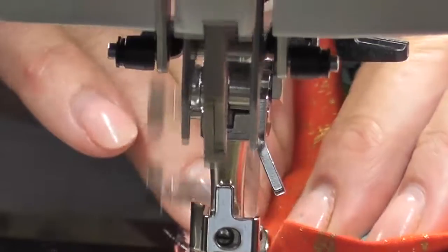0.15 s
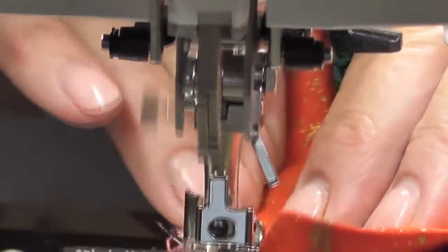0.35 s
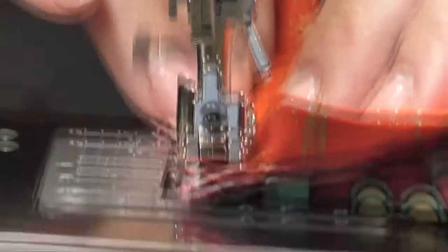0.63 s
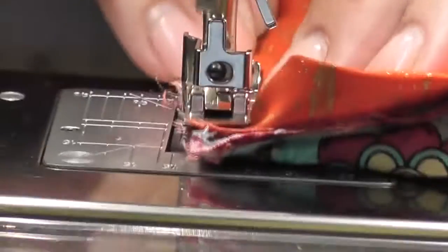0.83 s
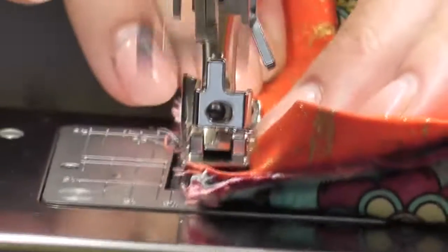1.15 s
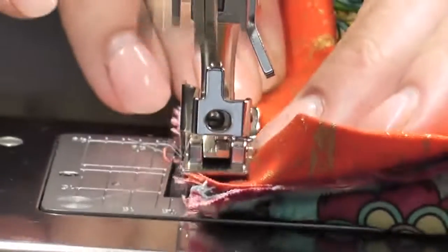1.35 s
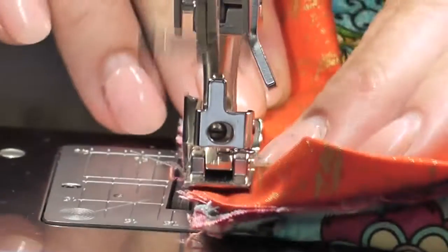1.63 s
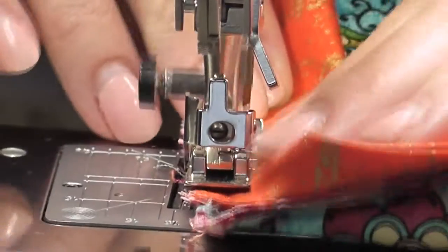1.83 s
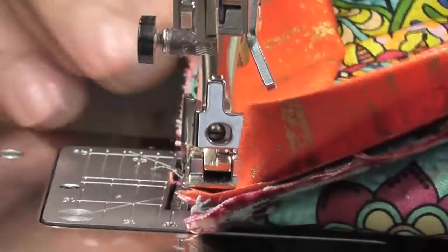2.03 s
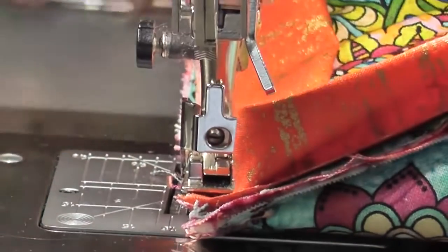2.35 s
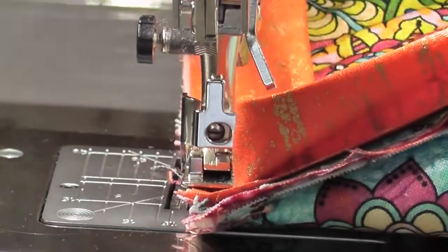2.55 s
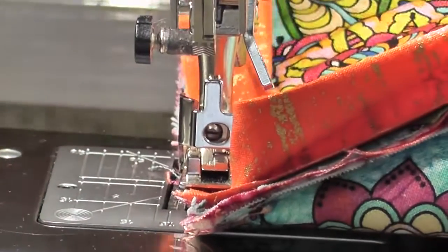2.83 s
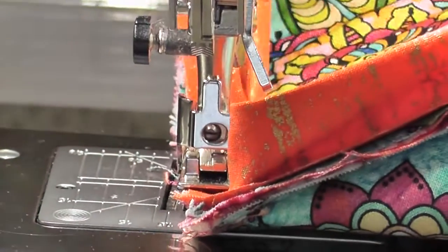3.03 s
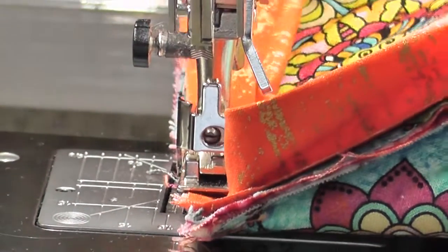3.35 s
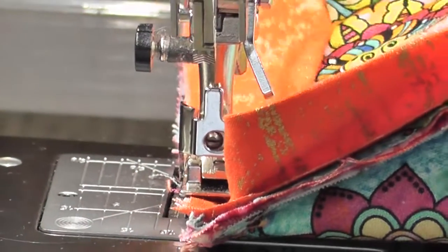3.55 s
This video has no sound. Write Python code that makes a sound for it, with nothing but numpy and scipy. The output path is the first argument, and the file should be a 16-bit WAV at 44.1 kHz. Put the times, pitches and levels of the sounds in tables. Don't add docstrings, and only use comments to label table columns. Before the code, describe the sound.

Close stereo pickup of a domestic sewing machine running steadily with knocking gears and ringing loose covers, coasting quickly to rest, then soft fabric rustle and light taps on the bed over low room hiss and hum.

```python
import sys
import numpy as np
from scipy import signal
from scipy.fft import rfft, irfft, next_fast_len
from scipy.io import wavfile
from scipy.ndimage import map_coordinates

SR = 44100
rng = np.random.default_rng(int(sys.argv[2]) if len(sys.argv) > 2 else 0)


def gain_from_decibels(decibels):
    exponent = np.asarray(decibels, float) / 20
    return 10 ** exponent


def wav_record(signal):
    frames = np.transpose(np.atleast_2d(signal))
    bounded = np.clip(frames, -1, 1)
    quanta = np.round(bounded * 32767).astype(np.int16)
    wavfile.write(sys.argv[1], SR, quanta)


N = 163170
T = np.arange(N) / SR

# freq_hz, density_db [dB per Hz]
HOOK_SPECTRUM = [(300, -21), (900, -13), (1600, 0), (4000, -7.5), (9000, -10), (13000, -13), (15700, -27)]


def unit(x):
    return x / np.sqrt(np.mean(x ** 2) + 1e-20)


def along(points, hz):
    f, v = np.transpose(points)
    return np.interp(np.log(hz + 1), np.log(f + 1), v)


def wobble(rate_hz):
    knots = rng.standard_normal(int(N * rate_hz / SR) + 4)
    return map_coordinates(knots, [T * rate_hz])


def filtered(x, response):
    n = x.shape[-1]
    m = next_fast_len(n + 8192)
    return irfft(rfft(x, m) * response(np.fft.rfftfreq(m, 1 / SR)), m)[..., :n]


def resonance(f, centre_hz, width_hz):
    damping = 1j * f * width_hz
    return damping / (centre_hz ** 2 - f * f + damping)


def body(modes, broad=0, tilt_db=0, dull_hz=20000):
    def response(f):
        ring = sum((-1) ** k * gain_from_decibels(db) * resonance(f, c, w) for k, (c, w, db) in enumerate(modes))
        tilt = gain_from_decibels(tilt_db * np.log2((f + 1) / 1000))
        low_cut = (1 + 120 / (1j * f + 1)) ** 2
        return tilt * (broad + ring) / (1 + 1j * f / dull_hz) ** 2 / low_cut
    return response


def colour(points):
    return lambda f: gain_from_decibels(along(points, f)) * (f > points[0][0])


def ringing(points):
    # centre_hz, width_hz, lift_db (negative
    modes_and_parts = [(138.4, 9.1, 9.5), (331, 17, -18), (355, 14, 1.5), (474, 11, 7), (603, 20, 5.5), (990, 99, 5),
                       (1270, 41, 7.5), (1575, 20, 10), (2134, 72, 6), (3147, 50, 4.5), (3610, 370, 6),
                       (4160, 220, 3.5), (6325, 56, 8.5), (7800, 40, -14)]

    def response(f):
        lift = 1 + sum((gain_from_decibels(db) - 1) * resonance(f, c, w) for c, w, db in modes_and_parts)
        return colour(points)(f) * lift
    return response


def add(track, start_s, level_db, rise_s, t60_s, response, spiky_db):
    t = np.arange(int(SR * min(rise_s + t60_s, .33)) + 300) / SR
    noise = rng.standard_normal(len(t)) * gain_from_decibels(spiky_db * rng.standard_normal(len(t)))
    after = np.clip(t - rise_s, 0, None)
    rise = np.clip(t / max(rise_s, 1e-4), 0, 1) ** 2
    blow = 1 + 0.28 * gain_from_decibels(-60 * after / 0.0063) * (t >= rise_s)
    ring = filtered(noise * rise * gain_from_decibels(-60 * after / t60_s) * blow, response)
    peak = np.sqrt(np.convolve(ring ** 2, np.ones(256) / 256).max())
    track[round(start_s * SR):][:len(t)] += gain_from_decibels(level_db) * ring / peak


def ports(shared, opposed, apart):
    # freq_hz, lean_db
    lean = [(60, -8), (180, -3), (550, 1), (1650, 3), (4970, -1), (15000, 3)]
    # freq_hz, lead_rad
    lead = [(0, 0), (260, 0.15), (11700, 0.045), (14400, -0.8), (15200, 0.1)]

    def sides(f):
        return np.exp(np.outer([.5, -.5], np.log(10) / 20 * along(lean, f) + 1j * along(lead, f)))

    def split(f):
        return np.outer([1, -1], gain_from_decibels(along(apart, f)))
    return filtered(shared, sides) + filtered(opposed, split)


def air():
    # freq_hz, density_db [dB per Hz]
    hiss_spectrum = [(20, -22), (55, -7), (85, -9), (150, 1.5), (300, 2), (1300, -5.5), (4000, -13),
                     (14300, -22.5), (15600, -35)]
    # time_s, level_db
    hiss_level = [(0, -50.5), (2.1, -54.5), (2.31, -56.5), (2.335, -60.5), (2.43, -56.5), (2.5, -56),
                  (2.68, -55), (2.76, -56.5), (2.93, -59), (3, -52), (3.7, -61)]
    # freq_hz, ratio_db
    hiss_apart = [(60, 5), (300, 0), (1500, -4), (5000, -12), (11000, -11), (14000, -3)]
    # freq_hz, rms_db
    hum_lines = [(100, -57.5)]
    a, b = unit(filtered(rng.standard_normal((2, N)), colour(hiss_spectrum))) * gain_from_decibels(.3 * wobble(8))
    hiss = gain_from_decibels(np.interp(T, *np.transpose(hiss_level))) * ports(a, b, hiss_apart)
    hum = sum(np.sqrt(2) * gain_from_decibels(db + 0.32 * wobble(5.5)) * np.sin(2 * np.pi * hz * T) for hz, db in hum_lines)
    return hiss + hum * gain_from_decibels([[-1.8], [1.5]])


def drive():
    # time_s, effort_db
    effort_curve = [(0, 0.5), (.2, -2.5), (.4, -3), (.5, -1.5), (.7, -0.5), (1.2, -1.5), (1.5, -1),
                    (1.75, 0), (1.82, -2.5), (1.845, -6.5), (1.92, -18), (1.97, -16), (2.06, -8),
                    (2.11, -18.5), (2.16, -51)]
    # centre_hz, width_hz, level_db
    case = [(247, 30, -1.5), (511.5, 44, -5.5), (749.5, 14, -4.5), (1107, 96, -8), (1556, 10, -9)]
    # freq_hz, density_db [dB per Hz]
    rattle_spectrum = [(110, -29), (200, -8.5), (350, -6), (620, -6.5), (1200, -10), (2500, -20),
                       (4500, -26.5), (9300, -32.5), (15600, -44.5)]
    # centre_s, peak_db
    surges = [(0.014, -41), (0.078, -34.5), (0.143, -34), (0.222, -30), (0.289, -31), (0.363, -28.5),
              (0.425, -27.5), (0.51, -43), (0.565, -38), (0.654, -42), (0.712, -32), (0.855, -30),
              (0.936, -33), (0.997, -32), (1.084, -39), (1.139, -31.5), (1.222, -35), (1.287, -31.5),
              (1.361, -46), (1.427, -34), (1.486, -43), (1.568, -33), (1.662, -37), (1.712, -32.5),
              (1.829, -40)]
    shaft_hz, load_top_s, teeth_hz = 7.0, .713, 249.8
    coast_s, slowing_per_s = 1.85, 0.62
    idle_db, surge_half_width_s = -42.5, 0.015
    gear_db, rattle_db = -3.5, -32.5

    turn = 2 * np.pi * shaft_hz * (T - load_top_s)
    effort = gain_from_decibels(np.interp(T, *np.transpose(effort_curve))) * (T < effort_curve[-1][0])

    speed = 1 - slowing_per_s * (T - coast_s).clip(0) + .008 * wobble(14) + .018 * np.sin(2 * turn + .6)
    count = np.cumsum(teeth_hz * speed) / SR
    teeth = np.diff(np.floor(count + .06 * wobble(250)), prepend=0).clip(0)
    teeth = teeth * gain_from_decibels(1.2 * rng.standard_normal(N))
    load = gain_from_decibels(idle_db)
    load = load + sum(gain_from_decibels(db) * np.exp(-.5 * ((T - s) / surge_half_width_s) ** 2) for s, db in surges)
    gears = load * unit(filtered(teeth, body(case, broad=0.021, dull_hz=5900)))

    grains = (rng.random(N) < 2600 / SR) * rng.standard_normal(N) * gain_from_decibels(1.55 * rng.standard_normal(N))
    grains = unit(grains) + 0.78 * rng.standard_normal(N)
    shake_db = 0.77 * np.cos(4 * turn + 2.43) + 1.63 * np.cos(2 * turn + 2.5)
    shake_db = shake_db + 0.8 * wobble(40.11) + 0.76 * wobble(5.71)
    loose = unit(filtered(grains * gain_from_decibels(shake_db), ringing(rattle_spectrum)))
    return effort * (gain_from_decibels(gear_db) * gears + gain_from_decibels(rattle_db) * loose)


def hook():
    # blow_s, peak_db
    clacks = [(0.0326, -30.5), (0.1053, -29.5), (0.1754, -30.5), (0.2464, -37), (0.3162, -44),
              (0.3897, -33), (0.463, -28.5), (0.5327, -35), (0.6058, -38), (0.678, -27.5), (0.7508, -29),
              (0.8216, -32.5), (0.893, -29.5), (0.963, -28.5), (1.0342, -31.5), (1.1065, -28),
              (1.1794, -34), (1.2477, -35), (1.318, -35), (1.3913, -29), (1.4622, -31.5), (1.5342, -27.5),
              (1.604, -31.5), (1.6763, -29.5), (1.7473, -34), (1.8497, -33)]
    # blow_s, peak_db
    snaps = [(0.0626, -30.5), (0.281, -38), (0.3494, -43), (0.4194, -39), (0.7077, -30.5), (1.1344, -42),
             (1.3452, -32), (1.4184, -33), (1.5637, -31), (1.7046, -36), (1.7749, -34)]
    out = np.zeros(N + SR)
    for s, db in clacks:
        add(out, s - .012, db - 9.0, .014, .1, ringing(HOOK_SPECTRUM), spiky_db=1.0)
    for s, db in snaps:
        add(out, s - .005, db - 7.5, .006, .07, ringing(HOOK_SPECTRUM), spiky_db=1.5)
    return out[:N]


def knocks():
    # start_s, peak_db, pitch_hz
    slack = [(0.105, -26.5, 1226), (0.108, -23.5, 490), (0.18, -31, 520), (0.234, -23.5, 974),
             (0.253, -27, 525), (0.323, -32, 540), (0.359, -28, 467), (0.387, -23.5, 590),
             (0.437, -29, 440), (0.577, -23, 506), (0.612, -29, 527), (0.646, -32, 473),
             (0.669, -25.5, 497), (0.68, -23.5, 1056), (0.742, -28, 1060), (0.758, -24, 494),
             (0.788, -21.5, 475), (0.815, -24, 500), (0.893, -26, 1576), (0.898, -25.5, 407),
             (0.96, -23, 1093), (0.984, -29, 503), (1.038, -24, 598), (1.092, -27, 1067), (1.181, -34, 500),
             (1.235, -27, 1180), (1.253, -33, 493), (1.359, -26, 518), (1.391, -25.5, 1570),
             (1.435, -29.5, 510), (1.462, -27.5, 1534), (1.518, -28, 1010), (1.608, -32, 497),
             (1.645, -25, 467), (1.661, -24, 1020), (1.702, -32, 470), (1.708, -26, 1006),
             (1.749, -29, 1080), (1.817, -32, 1326)]
    # start_s, peak_db, pitch_hz
    jolt = [
        (1.862, -33, 292),
    ]
    rise_s, t60_s, neighbour_t60_s, offset_db = 0.0022, 0.054, 0.025, 1.5
    out, t = np.zeros(N + SR), T[:SR // 8]
    for s, db, hz in slack + jolt:
        spread, phase = rng.random(2)
        neighbour_hz = hz * (1.12 + 0.34 * spread)
        neighbour = np.sin(2 * np.pi * (neighbour_hz * t + phase)) * gain_from_decibels(-60 * t / neighbour_t60_s)
        ring = np.sin(2 * np.pi * hz * t) + 0.33 * neighbour
        envelope = gain_from_decibels(db + offset_db - 60 * t / t60_s) * (1 - np.exp(-t / rise_s))
        out[round(s * SR):][:len(t)] += envelope * ring
    return out[:N]


def contacts():
    # centre_hz, width_hz, level_db
    braked_case = [(289, 55, 5), (523, 110, -1.5), (960, 120, -2), (1200, 17, -16), (2050, 60, -11)]
    # centre_hz, width_hz, level_db
    bed = [(273, 110, -12), (622, 73, -0.5), (900, 100, -7.5), (1290, 94, -3.5), (1664, 47, -11),
           (2630, 120, -4.5), (3510, 120, -11.5), (3990, 68, -6.5), (5640, 470, -11.5), (7160, 300, -7.5)]
    # start_s, level_db, rise_s, t60_s, tilt_db [dB per octave]
    blows = [
        (1.861, -26, 0.0022, 0.063, -1),
        (1.884, -32, 0.0047, 0.043, -2),
    ]
    # start_s, level_db, rise_s, t60_s, tilt_db [dB per octave]
    taps = [
        (2.5215, -36, .0012, 0.14, -1.7),
        (2.534, -40, 0.005, 0.28, -1.1),
        (2.593, -42.5, .015, 0.089, 1.8),
        (2.611, -40.5, 0.0093, 0.15, -0.7),
        (2.821, -51.5, 0.014, 0.17, -5),
        (2.9565, -48.5, 0.0021, 0.17, 0.8),
        (3.0516, -45.5, .002, 0.14, 1),
    ]
    # start_s, level_db, centre_hz, width_hz, t60_s
    ticks = [(1.9285, -49.5, 6400, 8000, .06), (1.929, -57, 14100, 2400, .075),
             (1.9305, -55, 6400, 750, 0.069), (1.9965, -51, 4870, 330, .04), (1.997, -51, 3460, 280, .045),
             (1.9975, -46, 2240, 280, 0.036), (2.114, -59, 6100, 1600, .05), (2.2925, -45.5, 960, 596, .07),
             (2.3045, -41, 740, 460, 0.12), (2.3635, -53.5, 3220, 1000, .055), (2.391, -49, 268, 200, .23),
             (2.4357, -49.5, 2100, 3100, 0.095), (2.4445, -57, 5100, 600, 0.38),
             (3.0532, -45.5, 3700, 2400, .055), (3.0625, -44.5, 1500, 520, .075)]
    out = np.zeros(N + SR)
    for s, db, rise_s, t60_s, tilt_db in blows:
        add(out, s, db, rise_s, t60_s, body(braked_case, 0.03, tilt_db, dull_hz=2460), spiky_db=3.5)
    for s, db, rise_s, t60_s, tilt_db in taps:
        add(out, s, db, rise_s, t60_s, body(bed, 0.16, tilt_db, dull_hz=3770), spiky_db=2)
    for s, db, hz, width_hz, t60_s in ticks:
        add(out, s, db, .002, t60_s, lambda f: body([(hz, 1.5 * width_hz, 0)])(f) ** 3, spiky_db=3.5)
    return out[:N]


def strokes_envelope(strokes, power):
    arch = lambda s, length_s: np.sin(np.pi * np.clip((T - s) / length_s, 0, 1)).clip(0)
    return sum(gain_from_decibels(db) * arch(s, length_s) ** power for s, length_s, db in strokes)


def cloth():
    # start_s, length_s, level_db
    drags = [
        (2.02, 0.083, -59),
        (2.473, 0.091, -52.5),
        (2.566, 0.1, -50.5),
        (2.791, 0.12, -62.5),
    ]
    # start_s, length_s, level_db
    brush = [
        (2.803, .1, -56),
    ]
    # freq_hz, density_db [dB per Hz]
    cloth_spectrum = [(88, -41), (150, -20), (353, -24), (412, -11.5), (656, -15), (949, -17.5),
                      (1730, -16), (15600, -36)]
    slide_s, slide_end_s, slide_fade_s, slide_db = 2.955, 3.56, .2, -56
    ease = np.clip((slide_end_s - T) / slide_fade_s, 0, 1) ** .5
    slide = gain_from_decibels(slide_db) * np.clip((T - slide_s) / .01, 0, 1) * ease
    press = strokes_envelope(drags, 1.5) + slide
    crackle_db = 3 * rng.standard_normal(N) + 1.3 * wobble(60) + .4 * wobble(12)
    fibres = rng.standard_normal(N) * gain_from_decibels(crackle_db)
    dragged = press * unit(filtered(fibres, colour(cloth_spectrum)))
    swept = strokes_envelope(brush, .5) * unit(filtered(fibres[::-1], colour(HOOK_SPECTRUM)))
    return dragged + swept


def room(x, t60_s):
    hop = SR // 5
    out = np.zeros((2, N + 6 * hop))
    x = np.pad(x, [(0, 0), (hop, 2 * hop)])
    window = np.sin(np.pi * np.arange(2 * hop) / (2 * hop))
    for i in range(0, N + hop, hop):
        tail = rng.standard_normal((2, 2 * hop)) * gain_from_decibels(-60 * T[:2 * hop] / t60_s)
        tail = tail / np.linalg.norm(tail[0])
        out[:, i:i + 4 * hop - 1] += signal.fftconvolve(x[:, i:i + 2 * hop] * window, tail, axes=1)
    return out[:, hop:hop + N]


def scene():
    # freq_hz, ratio_db
    near_apart = [(60, -8), (250, -11), (700, -11), (2000, -10), (4000, -15), (7000, -41), (11000, -11.5),
                  (14000, -3)]
    room_t60_s, room_db, machine_wet_db = 0.34, -3.5, -6.5
    background = air()
    machine = drive() + hook() + knocks()
    hands = contacts() + cloth()
    sends = np.array([gain_from_decibels(machine_wet_db) * machine + hands, machine + hands])
    tail, opposed = room(sends, room_t60_s)
    return ports(machine + hands + gain_from_decibels(room_db) * tail, opposed, near_apart) + background


def band_limit(x):
    return signal.sosfilt(signal.butter(12, 15710, fs=SR, output="sos"), x)


def record(dry):
    dip_hz, width_hz, depth = 2522, 54, 0.87
    mix = filtered(dry, lambda f: 1 - depth * np.exp(-((f - dip_hz) / width_hz) ** 2))
    return band_limit(mix)


dry = scene()
out = record(dry)
wav_record(out)
```